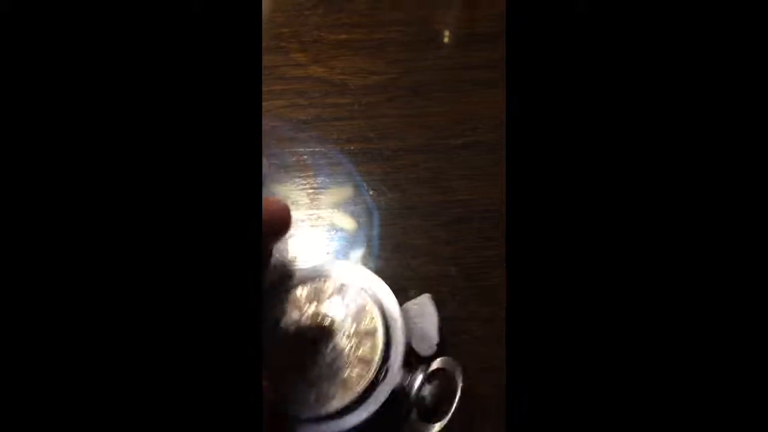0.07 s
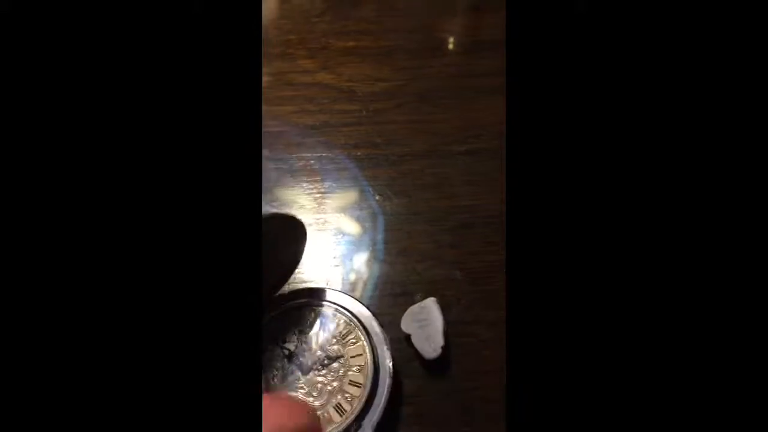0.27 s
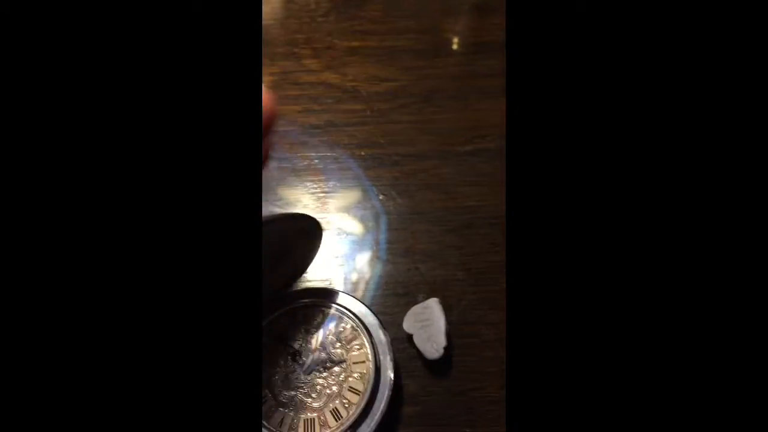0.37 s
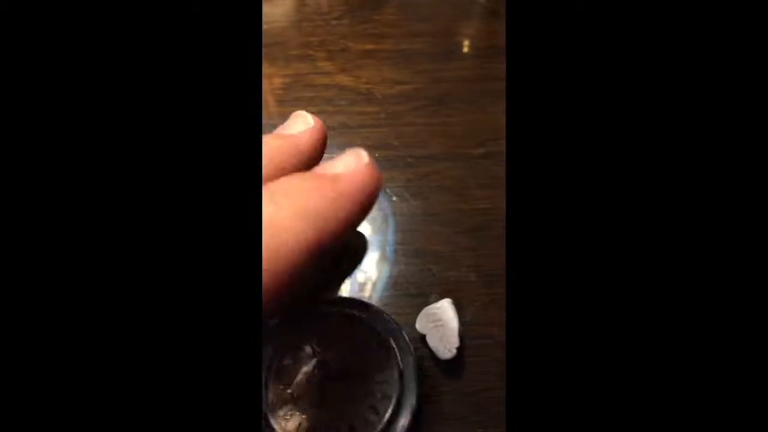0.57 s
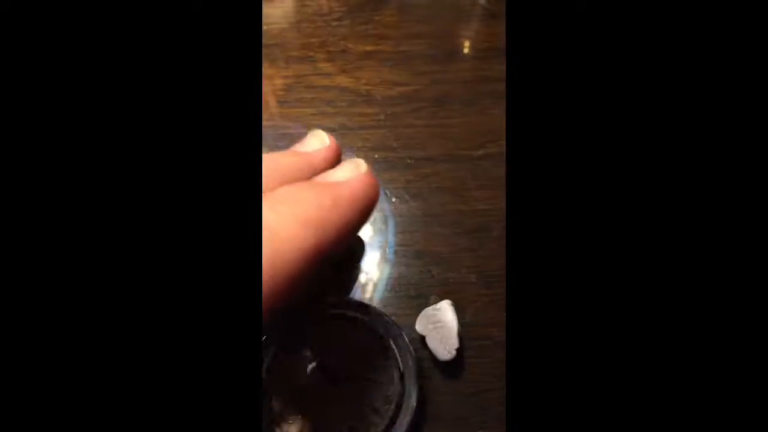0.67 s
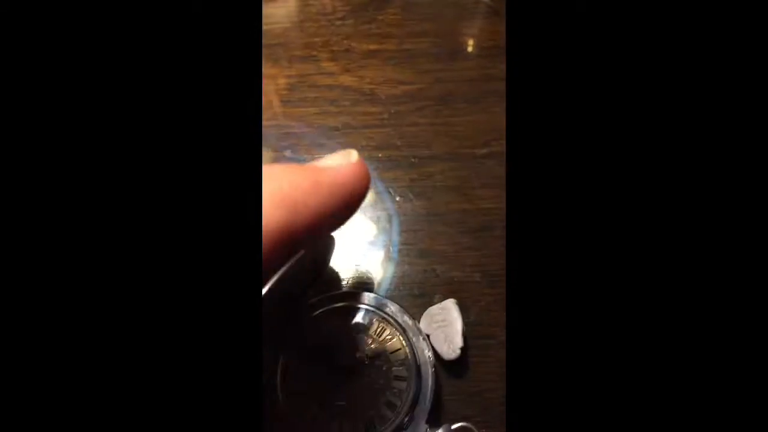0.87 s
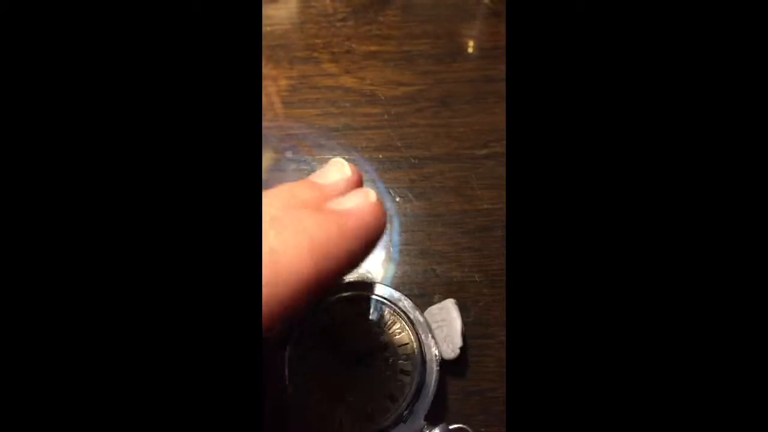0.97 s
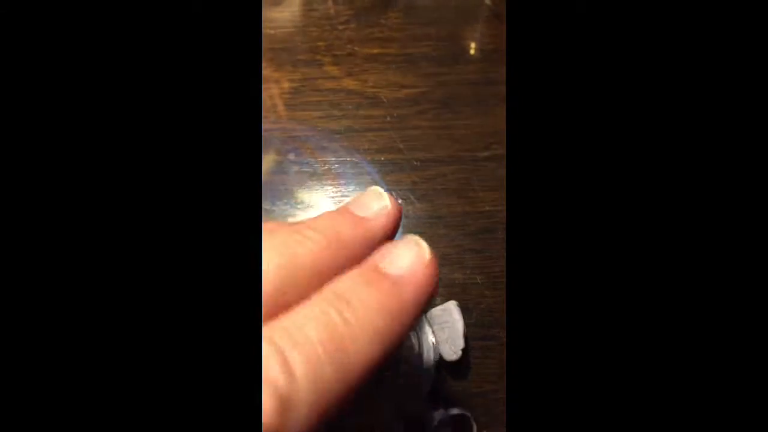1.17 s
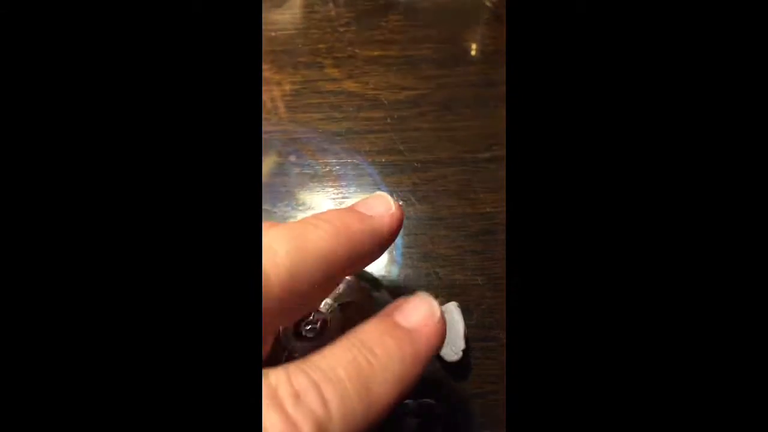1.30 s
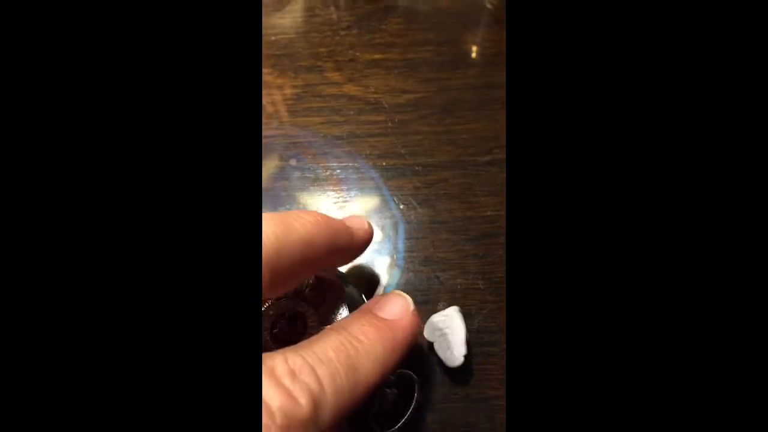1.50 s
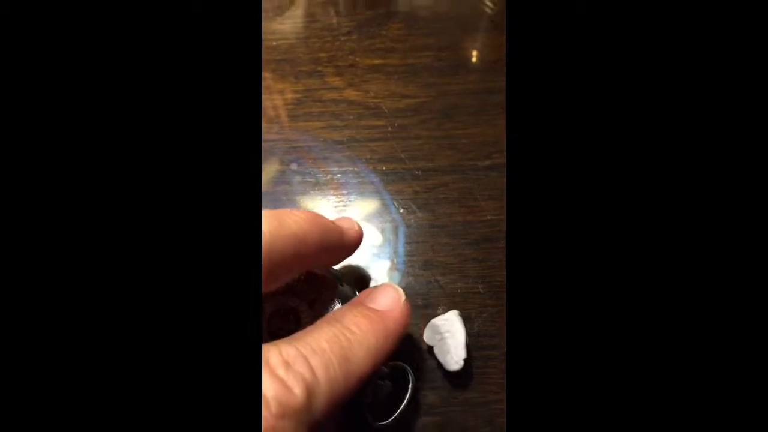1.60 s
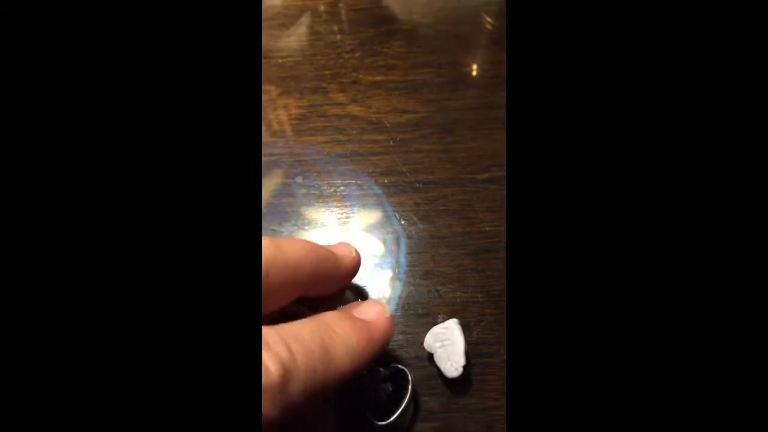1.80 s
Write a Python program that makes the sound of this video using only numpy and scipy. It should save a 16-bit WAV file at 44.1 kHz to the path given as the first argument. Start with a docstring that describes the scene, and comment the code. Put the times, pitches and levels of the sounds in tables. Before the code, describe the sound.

Close up in a small room, a metal pocket watch rattles onto a wooden tabletop. Small taps and a faint gritty scrape follow as it is nudged, then three sharp metallic clicks, over a faint low hum and hiss.

```python
"""In a small room, a metal pocket watch is set down on a wooden table. Skin rubs on its case,
which rocks and clatters to rest. Fingers shift it over fine grit, and each touch makes the metal
tick and the wood knock. Then they work three sharp snaps out of its catch and lid.
A low hum and a faint hiss lie underneath."""
import sys
import numpy as np
from scipy import signal
from scipy.fft import rfft, irfft
from scipy.io import wavfile

SR = 44100
rng = np.random.default_rng(int(sys.argv[2]) if len(sys.argv) > 2 else 0)


def store_pcm(level_fs):
    """Save levels as 16-bit WAV."""
    pcm = np.round(np.clip(level_fs, -1, 1) * 32767).astype(np.int16)
    wavfile.write(sys.argv[1], SR, np.atleast_2d(pcm).T)


N = 81585
T = np.arange(N) / SR
RING_T = T[:SR // 3]  # the clock for one short sound, in seconds


def gain(db):
    """Turn decibels (dB) into a number to multiply by."""
    return 10 ** (np.asarray(db) / 20)

def unit_level(x):
    """Scale a sound so that its average power is 1."""
    return x / np.sqrt(np.mean(x ** 2) + 1e-20)

def unit_hit(x):
    """Give a short sound the energy of 0.01 seconds at power 1."""
    return x * np.sqrt(.01 * SR / (np.sum(x ** 2) + 1e-20))

def level_curve(rows):
    """Join (seconds, dB) points into a gain that changes over time."""
    return gain(np.interp(T, *np.transpose(rows)))

def fade(seconds, t=RING_T):
    """Die away by 60 dB in the given fade time."""
    return np.exp(-np.log(1000) * t / seconds)

def colour(x, spectrum):
    """Shape the tone with (Hz, dB) points, falling steeply below the first."""
    hz, db = np.transpose(spectrum)
    freqs = np.maximum(np.arange(len(x) // 2 + 1) * SR / len(x), 1)
    shape = gain(np.interp(np.log(freqs), np.log(hz), db))
    bass_cut = np.minimum(freqs / hz[0], 1) ** 3
    return irfft(rfft(x) * shape * bass_cut, len(x))

def noise(spectrum, size=len(RING_T)):
    """Noise with the given tone colour, at power 1."""
    return unit_level(colour(rng.standard_normal(size), spectrum))

def cut_bass(x, hz, order):
    """Weaken everything below the given frequency."""
    return signal.sosfilt(signal.butter(order, hz, "high", fs=SR, output="sos"), x)

def ring(notes, strengths=1):
    """A struck object's own notes die away; every second one is flipped upside down."""
    strengths = strengths * (-1.) ** np.arange(len(notes))
    return sum(strength * gain(db) * fade(fade_s) * np.sin(2 * np.pi * hz * RING_T)
               for strength, (hz, db, fade_s) in zip(strengths, notes))

def strike(notes, strengths):
    """One blow on an object: each note answers with a random strength and sign."""
    uneven = gain(2.5 * rng.standard_normal(len(notes)))
    return unit_hit(ring(notes, strengths * uneven * rng.choice([-1, 1], len(notes))))

def add(out, start_s, sound):
    """Mix a sound in at its start time."""
    i = int(start_s * SR)
    out[i:i + len(sound)] += sound[:N - i]


# How loud the hum is. Each row: time in seconds, level in dB.
HUM_LOUDNESS = [(0.0, -56.5), (0.184, -45.5), (0.406, -43), (0.452, -40.5), (1.4, -61), (1.57, -51),
                (1.628, -57), (1.776, -52), (1.85, -68)]
# Weaker, steady hums. Each row: pitch in Hz, level in dB.
STEADY_HUMS = [(61, -59), (122.5, -67.5)]
# The tone of the hiss. Each row: frequency in Hz, relative level in dB.
HISS_TONE = [(25, -23), (45, -3.5), (70, -1), (110, -5), (200, -18.5), (300, -18), (620, -26.5),
             (1330, -30.5), (2800, -33), (4800, -38.5), (7000, -40.5), (10700, -43.5), (13600, -38.5),
             (16000, -54)]

def hum_and_hiss(hum_hz=73.55, hiss_db=-57.5):
    """A low hum swells and sinks over two weaker tones and the room's hiss."""
    hum = level_curve(HUM_LOUDNESS) * np.sin(2 * np.pi * hum_hz * T)
    steady = sum(gain(db) * np.sin(2 * np.pi * (hz * T + rng.random())) for hz, db in STEADY_HUMS)
    return np.sqrt(2) * (hum + steady) + gain(hiss_db) * noise(HISS_TONE, N)


# How loud the rubbing is. Each row: time in seconds, level in dB.
RUB_LOUDNESS = [(0, -57.5), (.03, -54.5), (.045, -70), (.09, -57.5), (.125, -68), (.16, -56), (.2, -63),
                (.24, -79.5)]
# The tone of skin on metal. Each row: frequency in Hz, relative level in dB.
RUB_TONE = [(900, -10.5), (1120, 5), (1350, -14), (1600, -4), (2000, -12), (2600, -10.5), (3050, 6.5),
            (3600, -7.5), (4150, 2), (4700, -26), (6200, -25), (6600, 1), (7100, -7.5), (7800, -23),
            (9600, -27), (10150, -11.5), (10800, -27), (15000, -22)]

def skin_rub():
    """Skin rubs on the case as the watch is lowered."""
    return level_curve(RUB_LOUDNESS) * noise(RUB_TONE, N)


# The case's own notes. Each row: pitch in Hz, relative level in dB, fade time in seconds.
CASE_NOTES = [(1964, -12, 0.036), (3310, -4, 0.034), (3450, -3.5, 0.028), (4134, 0, 0.024), (4690, -9, .04),
              (5310, -6.5, .03), (5944, -4, 0.031), (7130, -3, 0.075), (8850, -6, 0.046),
              (9200, -8.5, 0.16), (11300, -11, 0.07), (14000, -4, 0.044)]

def metal_tick(crack_tone, brightness, ring_db):
    """Metal meets wood with a short crack, and the case rings until the fingers damp it."""
    def treble_db(hz):
        """Brightness adds or removes this many dB for each octave above 3100 Hz."""
        return brightness * np.maximum(np.log2(hz / 3100), 0)
    tone = [(hz, db + treble_db(hz) + 3 * rng.standard_normal()) for hz, db in crack_tone]
    crack = unit_hit(noise(tone) * (fade(.005) + gain(-13) * fade(.025)))
    case = strike(CASE_NOTES, gain(treble_db(np.array(CASE_NOTES)[:, 0])))
    finger_damping = fade(.16)
    return crack + gain(ring_db) * case * finger_damping


# The table top's own notes. Each row: pitch in Hz, relative level in dB, fade time in seconds.
WOOD_NOTES = [(221.5, -9.5, 0.13), (291.5, -4, 0.12), (324, -8.5, 0.091), (411, -14.5, 0.12),
              (489.2, -3.5, .08), (578, -1.5, 0.044), (624.4, 0, 0.069), (718, -3.5, 0.07),
              (862, -1, 0.064), (927, 3, 0.036), (1032, -12, 0.086), (1166, -1.5, 0.049),
              (1346, -7.5, 0.035)]

def wood_knock(centre_hz, width_octaves, rise_s=.00046):
    """A knock wakes the table's notes near one pitch, with little bass beneath them."""
    octaves_away = np.log2(np.array(WOOD_NOTES)[:, 0] / centre_hz)
    wood = strike(WOOD_NOTES, 1 / (1 + (octaves_away / width_octaves) ** 2))
    swell = 1 - np.exp(-RING_T / rise_s)  # the fingers cushion each knock
    return unit_hit(cut_bass(wood * swell, hz=168, order=2))

def touches(rows, crack_tone, tick_db, ring_db, knock_db, width_octaves):
    """Each touch of watch on table is a tick and a knock; tick_db and knock_db shift every row."""
    out = np.zeros(N)
    for start_s, metal_db, wood_db, centre_hz, brightness in rows:
        tick = gain(metal_db + tick_db) * metal_tick(crack_tone, brightness, ring_db)
        knock = gain(wood_db + knock_db) * wood_knock(centre_hz, width_octaves)
        add(out, start_s, tick + knock)
    return out


# Light touches on the wood. Each row: start in seconds, relative tick level in dB,
# relative knock level in dB, centre of the knock in Hz, tick brightness in dB per octave.
NUDGE_TOUCHES = [(.0865, -40, -87, 800, 20), (.139, -53.5, -43.5, 920, 5), (.2055, -47.5, -41, 770, -8),
                 (.3135, -42, -51, 850, -2), (.3225, -30.5, -36, 680, -2), (.3285, -32.5, -36.5, 596, -7),
                 (.3395, -29, -37, 825, 1), (.350, -50, -37.5, 860, 3), (.366, -35.5, -39.5, 875, -6),
                 (.379, -35, -34.5, 560, 5), (.3858, -31, -37.5, 850, -2), (.4008, -35.5, -38, 800, -2.5),
                 (.4156, -42.5, -40.5, 495, 0), (.449, -48.5, -42, 580, -2), (.4722, -42, -41.5, 485, 4.5),
                 (.4828, -39, -46, 590, 12), (.5295, -41.5, -33, 600, 1), (.535, -37, -33.5, 700, 1),
                 (.557, -42, -52, 565, 10), (.5718, -40, -38.5, 506, -4), (.582, -32.5, -35.5, 694, -2.5),
                 (.5864, -36.5, -37.5, 514, -1), (.595, -38, -43.5, 560, -2), (.602, -45, -43, 504, 7),
                 (.616, -45.5, -39, 517, -9), (.6295, -59, -49, 567, -13), (.699, -40.5, -39.5, 605, 4.5),
                 (.7055, -46, -43, 600, -4), (.7215, -50, -44, 587, 3), (.8065, -38.5, -37.5, 584, -0.5),
                 (.8243, -40.5, -40.5, 593, -3), (.834, -57, -41, 660, -4), (.845, -32.5, -37, 695, 1),
                 (.851, -41.5, -47, 597, 2), (.8773, -36, -40, 610, 10.5), (.886, -54, -40, 630, 0),
                 (.893, -50, -39, 635, 0), (.903, -52.5, -42, 634, -9), (.956, -42, -48.5, 870, 12),
                 (1.0075, -53.5, -48, 580, -3), (1.0328, -47, -44, 700, -4), (1.0375, -55, -37.5, 635, -2),
                 (1.120, -45, -42, 575, -5), (1.2568, -68, -50.5, 530, 16), (1.2742, -43, -61.5, 600, 22),
                 (1.4652, -49, -42, 650, -12.5), (1.4734, -48.5, -42, 644, 6), (1.681, -46.5, -76, 600, 11),
                 (1.7648, -46, -40, 585, -3)]
# The tone of a light crack. Each row: frequency in Hz, relative level in dB.
NUDGE_TONE = [(800, -4), (1800, -22.5), (3000, -12), (4200, -6), (5600, 4.5), (8800, 3.5), (10200, -12),
              (11500, -6), (14000, -10.5), (16000, -1.5)]

def nudges():
    """Fingers shift the watch, so that it taps lightly on the wood."""
    return touches(NUDGE_TOUCHES, NUDGE_TONE, tick_db=-9, ring_db=-8, knock_db=-2.5, width_octaves=.34)


# The hits of the landing. Each row: start in seconds, relative tick level in dB,
# relative knock level in dB, centre of the knock in Hz, tick brightness in dB per octave.
LANDING_HITS = [(.2163, -34.5, -40, 790, -1.5), (.221, -23.5, -19.5, 800, -6),
                (.2245, -22.5, -23.5, 850, 1.5), (.2278, -16.5, -31.5, 870, -1.5),
                (.2323, -27, -19.5, 800, -3), (.2377, -18, -19.5, 850, -2.5), (.2395, -27, -31.5, 850, 3),
                (.2462, -23.5, -38.5, 840, 2), (.2505, -30, -31, 840, -1), (.2598, -27, -23.5, 800, -4),
                (.2642, -25, -49, 800, -13), (.2679, -17, -21, 835, -2.5), (.2718, -17.5, -20, 750, -0.5),
                (.2752, -21.5, -34, 870, -4), (.2805, -32, -40, 850, -10), (.2905, -30, -49, 850, -3),
                (.2935, -32, -35, 850, -3), (.3003, -31.5, -28.5, 765, -5)]
# The tone of a hard crack. Each row: frequency in Hz, relative level in dB.
LANDING_TONE = [(700, -11), (1250, -4), (1550, -11.5), (1950, -3.5), (2300, -14), (2900, -1.5), (3350, 8.5),
                (3750, -7), (4200, 1), (4900, 0), (6000, 2), (8500, 1), (10500, -6), (12500, -2),
                (15000, -2.5)]

def landing():
    """The case rocks and clatters to rest; its harder hits wake more of the table's notes."""
    return touches(LANDING_HITS, LANDING_TONE,
                   tick_db=-8.5, ring_db=-3.5, knock_db=-4.5, width_octaves=.91)


# How loud the grit is. Each row: time in seconds, level in dB.
GRIT_LOUDNESS = [(0, -90), (.215, -82.5), (.235, -52), (.29, -47.5), (.4, -48), (.44, -70), (.51, -72.5),
                 (.6, -52.5), (.66, -74), (.85, -62), (.94, -75), (1.2, -77), (1.29, -55), (1.4, -77.5),
                 (1.48, -63), (1.85, -93)]
# The tone of the grit. Each row: frequency in Hz, relative level in dB.
GRIT_TONE = [(600, -10.5), (1100, -6), (1800, -14.5), (3500, -17), (5500, -2), (7100, -3), (9000, 1.5),
             (10300, -10.5), (11500, -7), (14000, -8), (15200, -5)]

def grit(grains_per_second=1100):
    """Fine grains tick at random under the shifting case."""
    ticks = rng.random(N) < grains_per_second / SR
    sizes = gain(2.5 * np.minimum(rng.exponential(1, N), 4))
    grains = ticks * sizes * rng.choice([-1, 1], N)
    return level_curve(GRIT_LOUDNESS) * unit_level(colour(grains, GRIT_TONE))


# The notes of each snap. Each row: pitch in Hz, relative level in dB, fade time in seconds.
FIRST_NOTES = [(1446, -35, 0.05), (2850, -31.5, 0.036), (4160, -20, 0.017), (5390, -1.5, 0.013),
               (5930, 2, 0.0096), (6350, -9, 0.0041), (10050, -11, 0.019), (10900, -2.5, 0.0033),
               (11360, -10, 0.014), (13800, -20, .009)]
SECOND_NOTES = [(633, -16.5, 0.044), (3000, -26, 0.017), (3910, -24, .012), (5800, -10.5, 0.0079),
                (6850, -3.5, 0.0095), (7300, -8, 0.0074), (8200, -17.5, .012), (8800, -8, 0.0057),
                (15050, -15, 0.013)]
THIRD_NOTES = [(688, -9.5, 0.018), (868, -9, 0.028), (1380, -28, 0.0087), (2450, -25, .007),
               (2990, -2, 0.019), (3240, -7.5, .02), (4730, -12, 0.013), (5220, -9.5, 0.021),
               (5970, -4.5, 0.021), (6900, -10.5, 0.022), (7900, -20.5, 0.0081), (9550, -9, 0.01)]
# The snaps. Each row: start in seconds, ring gain in dB, head start of the first touch in seconds,
# that touch's level against the ring in dB, scrape level in dB, scrape fade time in seconds.
SNAP_EVENTS = [(1.0882, -15.5, .0007, -3.5, -26.5, 0.0081), (1.3017, -14, 0.00038, -52, -32, 0.015),
               (1.5527, -19, .0013, -2, -30.5, 0.019)]
# The tone of the scrape, one list per snap. Each row: frequency in Hz, relative level in dB.
SCRAPE_TONES = [(1000, -19), (1430, -29), (2000, -39.5), (3200, -26), (4700, -10), (5600, 14), (6200, 6),
                (7600, -10.5), (9300, -11), (10400, 4.5), (12300, -9.5), (15000, -11)], [(1000, -31),
                (2300, -32), (4000, -3), (4800, -15), (5750, 7.5), (6900, -2), (8600, -1), (10800, -15),
                (15000, -4)], [(400, -16.5), (850, 13.5), (1250, -9), (1800, -16), (2500, 5.5), (3050, 7.5),
                (4000, -10), (5900, -12), (7700, -12), (10000, -11), (15000, -18)]

def snaps():
    """A sprung part of the catch or lid touches, scrapes and strikes home; fingers damp it at once."""
    out = np.zeros(N)
    buzz = gain(-23) * fade(.084)  # loose parts buzz briefly after each snap
    for event, notes, tone in zip(SNAP_EVENTS, (FIRST_NOTES, SECOND_NOTES, THIRD_NOTES), SCRAPE_TONES):
        start_s, ring_db, ahead_s, touch_db, scrape_db, scrape_s = event
        ringing = gain(ring_db) * ring(notes)
        scrape = unit_hit(noise(tone) * (fade(scrape_s) + buzz))
        add(out, start_s - ahead_s, gain(touch_db) * ringing * (RING_T < ahead_s))
        add(out, start_s, ringing + gain(scrape_db) * scrape)
    return cut_bass(out, hz=480, order=3)  # small parts send out no bass


# The tone of the echoes. Each row: frequency in Hz, boost or cut in dB.
ECHO_TONE = [(150, 11.5), (600, 4.5), (1500, 5.5), (3000, -3), (6000, -7.5), (10000, -1.5), (15000, -17)]

def room(x, delay_s=.003):
    """Quick echoes come off the table and hand, with a faint, longer tail from the room."""
    out, t = x.copy(), T[:SR // 2]
    for fade_s, db in ((.09, -13), (.39, -18)):
        dying = fade(fade_s, t) * (t > delay_s)
        echoes = colour(rng.standard_normal(len(t)), ECHO_TONE) * dying / np.sqrt(np.sum(dying ** 2))
        out += gain(db) * signal.fftconvolve(x, echoes)[:N]
    return out

def scene():
    """The watch on the table, heard from close by."""
    watch = skin_rub() + nudges() + landing() + grit() + snaps()
    return (hum_and_hiss() + room(watch))[None]

def record(dry, cutoff_hz=15200):
    """The very highest treble is cut off steeply."""
    return signal.sosfilt(signal.ellip(10, .1, 80, cutoff_hz, fs=SR, output="sos"), dry)


dry = scene()
out = record(dry)
store_pcm(out)
```